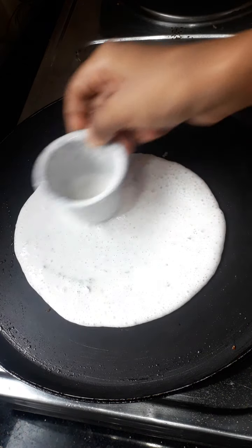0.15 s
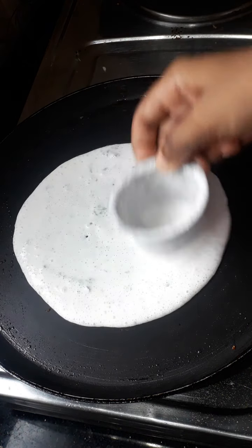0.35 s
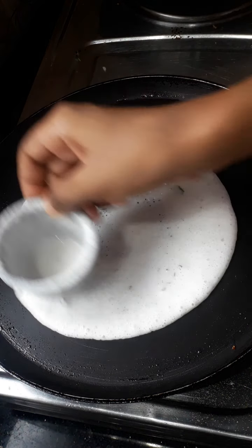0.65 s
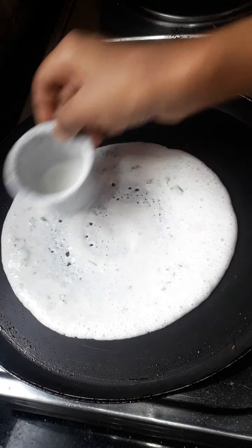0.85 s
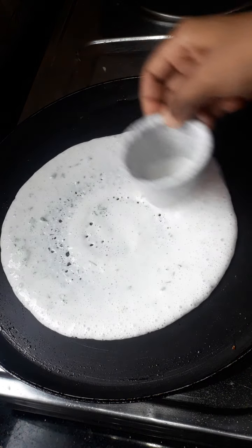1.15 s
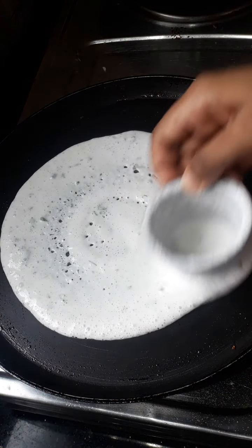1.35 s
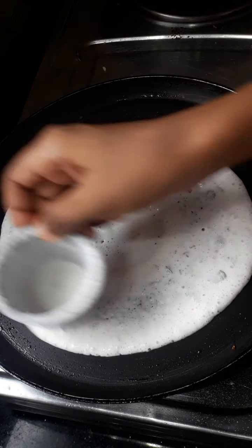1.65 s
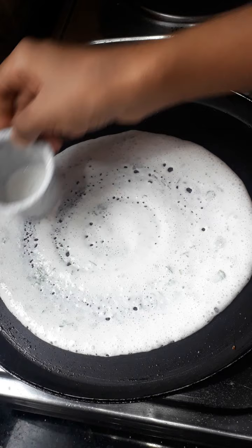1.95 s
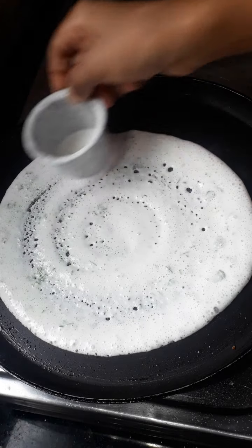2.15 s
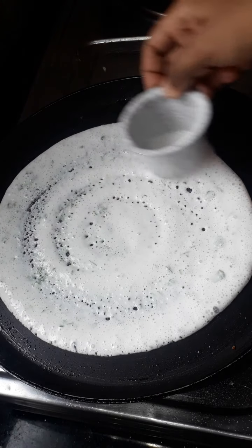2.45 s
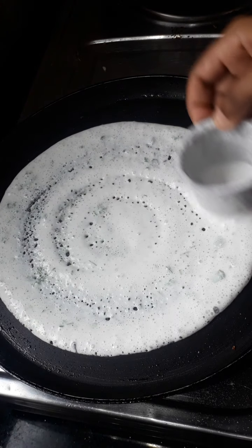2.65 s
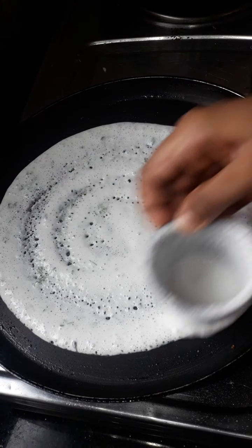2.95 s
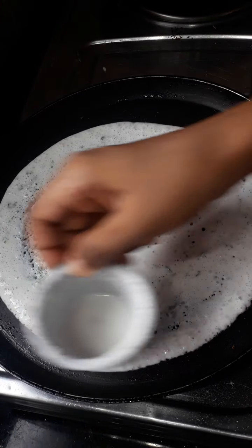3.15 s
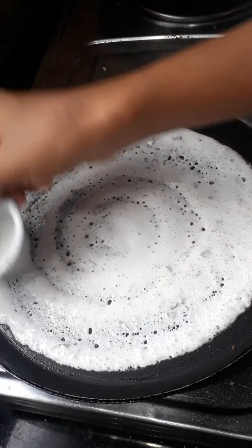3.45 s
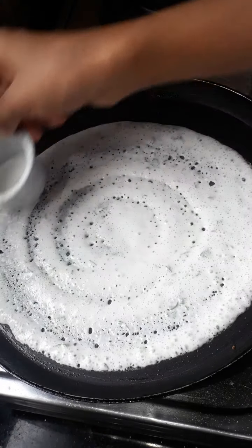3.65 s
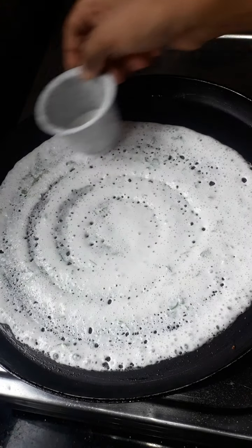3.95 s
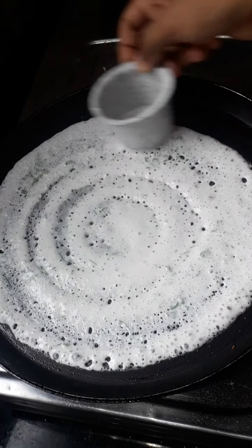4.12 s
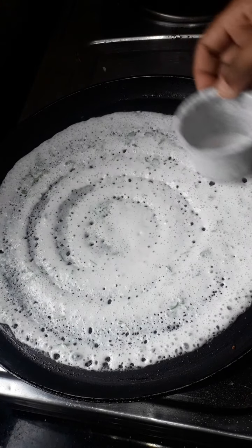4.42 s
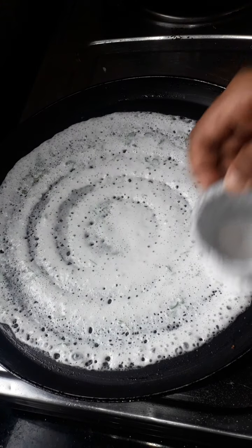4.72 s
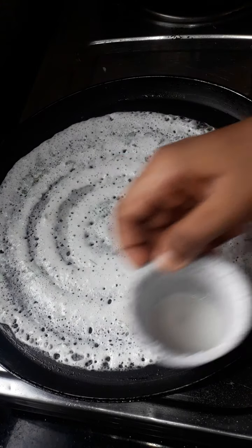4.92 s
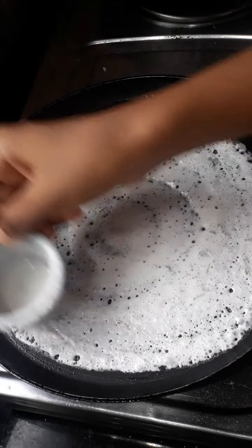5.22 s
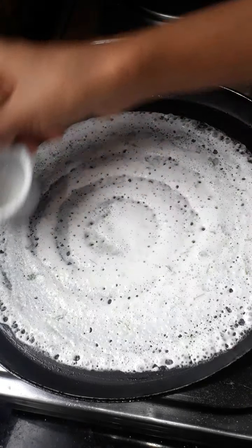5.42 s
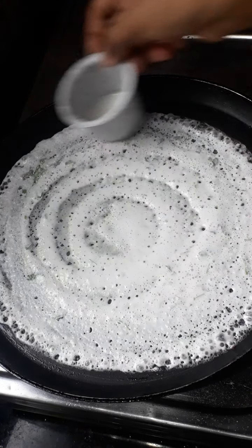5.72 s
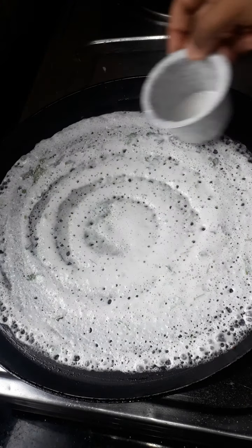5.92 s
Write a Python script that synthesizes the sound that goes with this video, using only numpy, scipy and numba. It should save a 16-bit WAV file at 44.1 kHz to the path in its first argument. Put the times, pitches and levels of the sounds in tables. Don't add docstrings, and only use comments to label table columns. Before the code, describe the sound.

Thin batter fries on a wide hot griddle, heard close and dry in a quiet home kitchen. A steady broadband hiss of steam carries clustered fine pops, sharp wet spits and tiny clicks. Soft dull thuds come now and then as the cup drags over the plate. Late on, the batter reaches the bare rim and the spitting grows denser, over a barely audible room hum.

```python
import sys
import numpy as np
from scipy import signal
from scipy.fft import rfft, irfft, next_fast_len
from scipy.io import wavfile
from scipy.ndimage import uniform_filter1d
from numba import njit

SR = 44100
rng = np.random.default_rng(int(sys.argv[2]) if len(sys.argv) > 2 else 0)


def gain_from_db(level_db):
    decades = np.asarray(level_db, float) / 20
    return 10 ** decades


def transcribe(signal):
    frames = np.atleast_2d(signal).T
    limited = np.clip(frames, -1, 1)
    pcm = np.round(limited * 32767).astype(np.int16)
    wavfile.write(sys.argv[1], SR, pcm)


N = 267975
TIME = np.arange(N) / SR
SPAN = next_fast_len(N)
FREQS = np.fft.rfftfreq(SPAN, 1 / SR)


def level(x, db):
    return x * gain_from_db(db) / np.sqrt(np.mean(x ** 2))


def gain(table):
    hz, db = np.transpose(table)
    return gain_from_db(np.interp(np.log(FREQS + 1), np.log(hz), db))


def colour(x, response):
    return irfft(rfft(x, SPAN) * response, SPAN)[:N]


def bell(centre_s, width_s):
    return np.exp(-.5 * ((TIME - centre_s) / width_s) ** 2)


def walk(rate):
    hold = max(int(SR / rate), 1)
    steps = np.repeat(rng.standard_normal(N // hold + 1), hold)[:N]
    return 1.3 * uniform_filter1d(uniform_filter1d(steps, hold), hold)


@njit
def rings(start, hz, cycles, size):
    out = np.zeros(N + 4000)
    for g in range(len(start)):
        turn = np.exp((2j * np.pi - 1 / cycles[g]) * hz[g] / SR)
        z, rise, fast = size[g] + 0j, 1., np.exp(-2 * hz[g] / SR)
        for i in range(min(int(5 * cycles[g] * SR / hz[g]), 3999)):
            z, rise = z * turn, rise * fast
            out[start[g] + i] += z.imag * (1 - rise)
    return out[:N]


def kitchen(x):
    t60_s, echo_db = 0.0039, -3.5
    t = np.arange(512) / SR
    tail = rng.standard_normal(512) * 1000. ** (-t / t60_s) * (t > .0004)
    return x + signal.oaconvolve(x, tail / np.linalg.norm(tail))[:N] * gain_from_db(echo_db)


# [f/Hz, level/dB per Hz]
ROOM_SPECTRUM = [(12, -40), (28, -32), (50, 6), (75, 12.5), (182, 5.5), (242, -16), (300, 9.5), (390, -42),
                 (660, -120)]


def room_hum():
    noise = level(colour(rng.standard_normal(N), gain(ROOM_SPECTRUM)), -74.5)
    mains = level(np.sin(2 * np.pi * 50 * TIME), -88)
    return noise + mains


def bubbles(count=40000):
    cluster_fade_s, whistle_cycles = .0012, 9
    when, pitch, length, strength, sign = rng.random((count, 5)).T
    crowding = np.cumsum(gain_from_db(7.0 * walk(800) + 2.5 * walk(120) + 1.2 * walk(30)))
    fade = np.exp(-1 / (cluster_fade_s * SR))
    crowding = signal.lfilter([1], [1, -fade], np.diff(crowding, prepend=0)).cumsum()
    start = np.searchsorted(crowding, when * crowding[-1]).clip(0, N - 1)
    hz = 300 + pitch * 17000
    cycles = 0.34 + 1.4 * length ** 4 + whistle_cycles * length ** 25
    strong_db = np.minimum(-3.2 * np.log(1 - strength), 13)
    size = np.sqrt(hz / cycles) * gain_from_db(strong_db) * np.sign(sign - .5)
    return kitchen(rings(start, hz, cycles, size))


# [t/s, level/dB]
BOIL_CURVE = [(0.0, 0), (0.2, -4.5), (0.5, 1.5), (0.75, 0), (1.2, 0.5), (1.45, 5), (1.7, 0.5), (2.05, -0.5),
              (2.15, 0), (2.25, -2.5), (2.4, 0.0), (3.2, 2.5), (3.5, 1), (4.15, -0.5), (4.25, 1.5),
              (5.0, 4.5), (5.3, 2.5), (6.08, -5)]
# [t/s, level/dB]
COARSE_CURVE = [(0, 3.5), (.2, 5), (.5, 2), (1.25, 2), (1.55, 0.5), (1.75, 4), (2.0, 3), (2.95, -1.5),
                (3.65, 1), (4.0, -2.5), (4.4, -2.5), (4.55, -1), (5.1, 0), (5.65, 3.5), (6.08, 1)]
# [t/s, level/dB]
SPLASH_CURVE = [(0.0, 5.5), (1.2, 0), (1.3, -3.5), (1.6, 1), (1.75, 0), (2.5, -5), (2.7, -4), (2.8, 1.5),
                (3.75, -2.5), (4.3, -3.5), (4.7, 2.5), (6.08, 2.5)]
# [t/s, level/dB]
JET_CURVE = [
    (0.0, 0),
    (0.2, 1.5),
    (0.4, 0),
    (3.1, -2),
    (3.9, -1.5),
    (4.35, 4),
    (4.7, 3.5),
    (5.05, 6.5),
    (5.35, 6),
    (6.08, 2.5),
]
# [boil/dB per dB, coarseness/dB per dB, splash/dB per dB, jets/dB per dB]
FOLLOW_WEIGHTS = [(0.93, 0.98, .01, -0.2), (0.94, 0.17, .01, -0.37), (0.83, -0.36, .01, -0.11),
                  (0.83, 0.027, .01, 1.07), (0.8, 0.31, 0.055, 0.34), (0.91, -0.33, 0.99, -0.13)]
# [t/s, level/dB]
GUSH_EVENTS = [(.25, -0.5), (.32, 1), (.54, 0.6), (.77, 0.5), (1.35, 0.9), (1.95, 1.3), (2.03, -1.2),
               (2.27, 0), (2.32, 0.5), (3.0, 0.5), (3.38, 0.9), (4.03, 0.4), (4.37, .8), (4.73, -.8),
               (4.78, 0.9), (4.89, -0.1), (4.92, 0.9), (5.075, -0.9), (5.16, 0.1), (.42, 2.2), (.62, 1),
               (2.78, -0.2), (5.65, 1), (5.7, 0), (5.82, 0.3), (5.96, 1.8), (6.03, -0.1)]


def boil():
    curves = (BOIL_CURVE, COARSE_CURVE, SPLASH_CURVE, JET_CURVE)
    controls = [np.interp(TIME, *np.transpose(curve)) for curve in curves]
    gushes = sum(db * bell(s, 0.024) for s, db in GUSH_EVENTS)
    strength = np.dot(FOLLOW_WEIGHTS, controls) + gushes
    hollow_db, hollow_until_s, hollow_fade_s = 3, 0.68, 0.091
    strength[2] += hollow_db / (1 + np.exp((TIME - hollow_until_s) / hollow_fade_s))
    flare_s, flare_width_s, flare_db = 5, 0.17, 3
    strength[4] += flare_db * bell(flare_s, flare_width_s)
    drying_db_s, clear_per_boil, clear_per_jet = 0.9, 0.65, 0.24
    drying = drying_db_s * (TIME - TIME.mean())
    return strength, drying - clear_per_boil * controls[0] - clear_per_jet * controls[3]


# [t/s, length/s, f/Hz, level/dB]
FOAM_PATCHES = [(0.34, 0.54, 490, -4.5), (0.39, .14, 13760, -3.7), (0.45, 0.067, 6700, -4.5),
                (.5, .1, 8900, 0), (.55, 0.15, 3250, -3.5), (0.57, 0.17, 5100, 2.5), (0.7, 0.12, 950, 3.5),
                (1, 0.067, 6120, -3.5), (1.26, 0.099, 610, 8), (1.45, 0.15, 3330, -4), (1.5, .2, 4900, 0),
                (1.51, .08, 6200, -4), (1.91, 0.058, 490, 8.5), (2.08, 0.073, 5300, -4),
                (2.46, 0.33, 9000, -0.5), (2.57, 0.43, 2000, 3), (2.5, 0.19, 2350, -1),
                (2.67, 0.14, 4960, -2.5), (2.6, 0.32, 1370, 3), (3.17, 0.18, 3600, -1.5),
                (3.34, 0.18, 1970, -3), (3.43, .15, 1250, 3), (3.76, .25, 4900, -1.5), (4.24, 0.4, 7300, 4),
                (4.8, 0.56, 7600, -3.5), (4.33, .25, 14180, 0), (5.05, 0.24, 11800, 1),
                (5.0, 0.17, 13000, -1), (5.36, .2, 4500, 3), (5.54, 0.56, 3500, -0.2),
                (6.1, 0.42, 1330, -3.5), (7.8, 0.13, 3790, -3), (4.5, .2, 5600, 1), (5.0, .2, 5500, 0),
                (1.42, .1, 2400, -1), (2.13, .1, 6700, 0), (3.9, 0.13, 3000, -2.5), (6, 0.14, 3200, -2),
                (2.95, .12, 1500, 0.5), (.42, .03, 10300, 2.5), (0.53, 0.035, 9000, 4),
                (2.85, .08, 15000, 0), (5.05, 0.031, 6300, 2.5), (5.16, 0.037, 7800, 4),
                (3.9, 0.052, 6100, -0.5), (3.2, 0.064, 2440, 3.5), (4.2, .12, 3200, 1.5),
                (4.88, .12, 690, -2), (4.26, 0.14, 420, 5.5), (1.65, 0.22, 1115, 2.5), (5.5, .12, 3000, 0)]


def patchy(x, size=1024):
    pitch_spread, flicker_db = 0.089, .5
    freqs, times, frames = signal.stft(x, SR, nperseg=size)
    db = np.zeros(frames.shape)
    for s, length, hz, patch_db in FOAM_PATCHES:
        across = np.exp(-.5 * (np.log((freqs + 1) / hz) / pitch_spread) ** 2)
        along = np.exp(-.5 * ((times - s) / length) ** 2)
        db += patch_db * np.outer(across, along)
    flicker = uniform_filter1d(rng.standard_normal(frames.shape), 21, axis=0)
    flicker = uniform_filter1d(flicker, 3, axis=1)
    db = db + flicker_db * flicker / flicker.std()
    return signal.istft(frames * gain_from_db(db), SR, nperseg=size)[1][:N]


# [from f/Hz, to f/Hz]
SIZE_RANGES = [
    (300, 1600),
    (2000, 2900),
    (3600, 4600),
    (5400, 6000),
    (6900, 8800),
    (11500, 16000),
]
# [f/Hz, level/dB]
SIZZLE_SPECTRUM = [(150, -66), (300, -30.5), (480, -18), (710, -6.5), (1050, -4.5), (1400, -8.5),
                   (1800, -5.5), (2150, -1), (3500, 0.5), (4900, -3.5), (6200, 0.5), (8200, 0),
                   (11000, -9.5), (15100, -18.5), (15900, -13)]
# [f/Hz, width/Hz, level/dB]
TINT_MODES = [(414, 53, 7), (514, 50, 4.5), (627, 10, 3), (943, 16, 3), (1116, 18, 7), (1525, 42, 4),
              (1660, 14, 7), (2740, 21, 2.5), (3550, 56, 2), (4770, 240, 0.5), (9460, 450, 0.5),
              (10940, 500, 0), (13800, 700, 3)]
BURST_SHARES = [-8.5, -5.5, -4.5, -8, -5, 0]


def sizzle():
    strength_db, clear_db = boil()
    tint_db = sum(db / (1 + ((FREQS - hz) / (width / 2)) ** 2) for hz, width, db in TINT_MODES)
    tint = gain(SIZZLE_SPECTRUM) * gain_from_db(tint_db)
    crowd = rfft(bubbles(), SPAN)
    crowd = crowd / np.sqrt(uniform_filter1d(np.abs(crowd) ** 2, 1500) + 1e-9)
    burst = crowd * tint
    vapour = rfft(rng.standard_normal(SPAN)) * tint
    clear = gain_from_db(clear_db)
    range_edges = np.log(SIZE_RANGES).ravel()
    range_index = np.arange(2 * len(SIZE_RANGES)) // 2
    out, surge = 0, walk(22)
    for k, db in enumerate(strength_db):
        share = np.interp(np.log(FREQS + 1), range_edges, range_index == k)
        pops, hiss = burst * share, vapour * share
        mix = level(irfft(pops, SPAN)[:N], BURST_SHARES[k]) * clear + level(irfft(hiss, SPAN)[:N], 0)
        mix = mix * gain_from_db(0.33 * surge + .5 * walk(50))
        mix = mix / np.sqrt(uniform_filter1d(mix ** 2, int(.09 * SR)) + 1e-9)
        out = out + level(mix * gain_from_db(db), 0) * np.linalg.norm(hiss)
    return level(patchy(out), -32.5)


# [t/s, peak level/dB, fade/s]
TUG_EVENTS = [(.05, -75, 0.17), (.97, -69, 0.093), (1.09, -75, .1), (1.18, -71, .08), (1.25, -52, 0.09),
              (1.31, -56, .06), (1.41, -63, 0.1), (1.52, -71, 0.092), (1.6, -71, 0.1), (1.82, -61, 0.089),
              (1.9, -61, 0.12), (2.07, -63, 0.11), (2.22, -66, 0.042), (2.64, -70, 0.053),
              (2.89, -72, 0.12), (3.02, -74, 0.066), (3.38, -61, 0.17), (3.72, -75, 0.1),
              (4.23, -70, 0.022), (4.38, -73, 0.1), (4.65, -66, 0.07), (4.95, -55.5, 0.075),
              (5.31, -61, 0.024), (5.55, -64, .05), (5.66, -57, 0.07), (5.79, -67, 0.036),
              (5.919, -70, .06)]
# [f/Hz, width/Hz, level/dB]
PLATE_MODES = [
    (89, 13, -2),
    (135, 48, -3.5),
    (182, 16, 3),
    (222.5, 20, 2),
    (300, 12.6, 6.5),
    (350, 36, 5.5),
    (450, 46, 3.5),
]


def drag():
    rise_s, slide_db = 0.045, -73.5
    force = gain_from_db(slide_db)
    for s, db, fade in TUG_EVENTS:
        force = force + gain_from_db(db) * np.exp(np.minimum((TIME - s) / rise_s, (s - TIME) / fade))
    modes = sum(gain_from_db(db) / (1 + 1j * (FREQS - hz) / (0.72 * width)) ** 2 for hz, width, db in PLATE_MODES)
    rumble = rng.standard_normal(N) * uniform_filter1d(force, int(0.015 * SR))
    low_pass = 1 + (FREQS / 500) ** 3
    high_pass = 1 + (75 / (FREQS + 1)) ** 6
    return colour(rumble, modes / low_pass / high_pass) * gain_from_db(17.5)


def strays(count=60):
    when, db, hz = rng.random((count, 3)).T
    return np.transpose([when * N / SR, -35 + 10 * db, 7000 + 800 * (4 * hz - 2)])


# [t/s, peak level/dB, f/Hz]
EARLY_SPITS = [(0.0709, -25, 7000), (0.1328, -30, 9300), (0.2171, -23, 7100), (0.2224, -28, 9600),
               (0.3093, -23, 5700), (0.3973, -25, 6900), (0.4197, -22, 8500), (0.5254, -17, 8000),
               (0.6152, -22, 5200), (0.7695, -24, 8500), (0.8387, -25, 4600), (0.9156, -30, 7300),
               (0.924, -29, 3800), (0.9459, -24, 7300), (0.9757, -25, 6900), (1.0172, -23, 5200),
               (1.0326, -28, 5100), (1.0788, -25, 7700), (1.1115, -26, 8500), (1.161, -20, 5000),
               (1.1812, -25, 3200), (1.2021, -21, 8300), (1.2766, -25, 5800), (1.3966, -21, 7600),
               (1.5309, -20, 7400), (1.5749, -21, 7200), (1.5851, -25, 4500), (1.7178, -28, 5000),
               (1.7427, -20, 7500), (1.8065, -27, 6200), (1.8258, -26, 7700), (1.8535, -25, 9100),
               (1.8954, -27, 9700), (1.9135, -26, 6700), (2.1044, -18, 7700), (2.1092, -27, 4400),
               (2.1488, -26, 3700), (2.1808, -24, 6900), (2.1905, -27, 5000), (2.2299, -21, 8600),
               (2.248, -18, 7100), (2.2905, -25, 8000), (2.3874, -31, 6900), (2.4434, -18, 7800),
               (2.481, -27, 3400), (2.6026, -28, 4700), (2.6696, -20, 7900), (2.7217, -29, 7800),
               (2.8482, -25, 6200), (2.881, -23, 4200), (2.9413, -24, 5100), (2.9795, -22, 5600),
               (2.9901, -24, 4700), (3.1373, -27, 6600), (3.1919, -25, 7100), (3.197, -25, 4200),
               (3.286, -22, 6500), (3.3627, -25, 4000), (3.3702, -24, 6500), (3.4393, -22, 5600)]
# [t/s, peak level/dB, f/Hz]
RIM_SPITS = [(3.5137, -22, 6500), (3.547, -23, 8300), (3.5863, -25, 7600), (3.66, -26, 4400),
             (3.678, -22, 5730), (3.7258, -23, 6600), (3.7324, -24, 5800), (3.7485, -26, 7300),
             (3.9071, -27, 4600), (4.0347, -26, 5000), (4.0596, -24, 3600), (4.1346, -26, 5600),
             (4.1484, -22, 6800), (4.161, -26, 7400), (4.1713, -24, 6200), (4.222, -25, 4700),
             (4.2513, -22, 4800), (4.4117, -23, 5000), (4.5068, -24, 5700), (4.5644, -26, 6200),
             (4.6373, -20, 6300), (4.9074, -17, 7300), (5.0551, -23, 6400), (5.087, -20, 5400),
             (5.2836, -20, 7500), (5.298, -22, 7600), (5.3664, -20, 6500), (5.4327, -15.5, 7300),
             (5.4827, -19, 6900), (5.4951, -21, 7100), (5.5265, -22, 6300), (5.6107, -24, 6500),
             (5.6401, -24, 5400), (5.6475, -27, 6800), (5.6579, -17, 6200), (5.7048, -28, 8800),
             (5.7121, -26, 6400), (5.7296, -26, 6900), (5.7371, -24, 6800), (5.807, -20, 7300),
             (5.8217, -26, 4000), (5.8269, -22, 6800), (5.8481, -25, 7700), (5.8586, -26, 7200),
             (5.8642, -17, 6200), (5.875, -22, 6100), (5.8938, -18, 7600), (5.911, -20, 7200),
             (5.9259, -24, 8200), (5.9342, -23, 7600), (5.957, -26, 7900), (5.9642, -23, 7300),
             (5.969, -22, 7100), (5.973, -21, 7500), (5.99, -25, 7600), (6.001, -27, 7600),
             (6.0441, -20, 7800), (6.0507, -24, 8100), (6.0637, -24, 6800), (6.0713, -19, 7400)]


def spits(count=5):
    spit_db, lead_s, spread_s = 8, .0001, 0.0034
    follower_db, ring_cycles = -6, 1.0
    s, db, hz = np.vstack([EARLY_SPITS, strays(), RIM_SPITS]).T
    follows = (np.arange(count) > 0)[:, None]
    late, pitch, weak = rng.random((len(s), count, 3)).T * follows
    start = ((s - lead_s + spread_s * late) * SR).astype(np.int64).clip(0, N - 1)
    tones = hz * (1 + .13 * pitch * np.cos(np.pi * np.arange(count))[:, None])
    size = gain_from_db(db + spit_db - 15.0 * weak + follower_db * (weak > 0))
    ring = rings(start.ravel(), tones.ravel(), np.full(tones.size, ring_cycles), size.ravel())
    crack = rings(start[0], 2.0 * hz.clip(0, 9000), np.full(len(hz), 0.61), gain_from_db(db - 23.0))
    return kitchen(ring + crack)


# [t/s, length/s, f/Hz, level/dB]
HUM_EVENTS = [(.98, .04, 300, -68), (1.1, 0.035, 182, -71), (1.22, .04, 182, -66), (1.26, 0.023, 350, -59),
              (1.3, .035, 182, -59), (1.42, 0.041, 300, -64), (1.578, 0.041, 213, -68.5),
              (1.64, .05, 89, -72), (1.89, 0.04, 182, -66), (2.08, 0.023, 182, -67), (2.12, .1, 298, -72),
              (4.12, .03, 70.6, -68), (1.227, .04, 89, -72), (1.45, 0.045, 200, -68), (1.9, .06, 110, -72),
              (2.2, .06, 130, -74), (.14, 0.054, 85, -73), (3.24, .04, 100, -72), (4.63, .06, 65, -72)]


def hums():
    tones = 0
    for s, length, hz, db in HUM_EVENTS:
        tones = tones + gain_from_db(db + 4) * bell(s, length) * np.sin(2 * np.pi * hz * TIME)
    return tones


# [t/s, peak level/dB]
TICK_EVENTS = [(0.2159, -20), (0.2538, -27), (0.3182, -30), (0.385, -30), (0.4155, -31), (0.7682, -21),
               (0.8355, -28), (0.9443, -25), (1.048, -26), (1.078, -23), (1.1104, -26), (1.1498, -27),
               (1.1598, -23), (1.1797, -26), (1.2321, -29), (1.2585, -21), (1.3304, -32), (1.3942, -28),
               (1.4431, -20), (1.6437, -24), (1.8502, -27), (1.8941, -28), (2.1031, -26), (2.1221, -27),
               (2.2288, -32), (2.2892, -28), (2.3331, -28), (2.4214, -31), (2.4418, -23), (2.5745, -32),
               (2.6279, -44), (2.6454, -33), (2.6683, -25), (2.7202, -32), (2.9687, -28), (3.0924, -36),
               (3.1373, -26), (3.2495, -29), (3.3218, -30), (3.3692, -23), (3.4381, -27), (3.4989, -20),
               (3.5448, -32), (3.6172, -31), (3.6531, -29), (3.694, -35), (3.8661, -34), (3.9379, -33),
               (3.9589, -23), (4.0587, -22), (4.1335, -31), (4.3804, -34), (4.4124, -39), (4.5321, -24),
               (5.047, -19), (5.4316, -26), (5.5243, -24), (5.5638, -29), (5.8471, -28), (5.9718, -30)]


def ticks():
    centre_hz, scatter_hz, tick_db, delay_s = 10500, 2500, 9.5, 0.00054
    s, db = np.transpose(TICK_EVENTS)
    hz = (centre_hz + scatter_hz * (2 * rng.random(len(s)) - 1)).clip(3000, 16000)
    start = ((s + delay_s) * SR).astype(np.int64).clip(0, N - 1)
    return kitchen(rings(start, hz, np.ones(len(s)), gain_from_db(db + tick_db)))


def scene():
    mono = room_hum() + sizzle() + drag() + spits() + hums() + ticks()
    return np.array([mono, mono])


def top_cut(x):
    return signal.sosfilt(signal.butter(12, 15730, fs=SR, output="sos"), x)


def record(dry):
    top_hz = 15760
    mix = signal.sosfilt(signal.ellip(10, .2, 80, top_hz, fs=SR, output="sos"), dry)
    return top_cut(mix)


dry = scene()
out = record(dry)
transcribe(out)
```